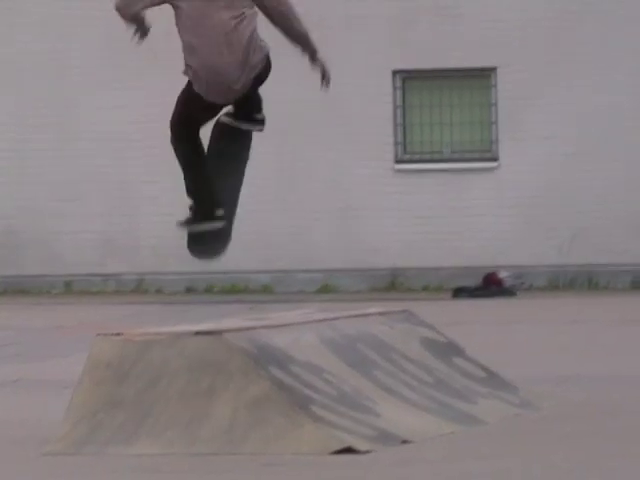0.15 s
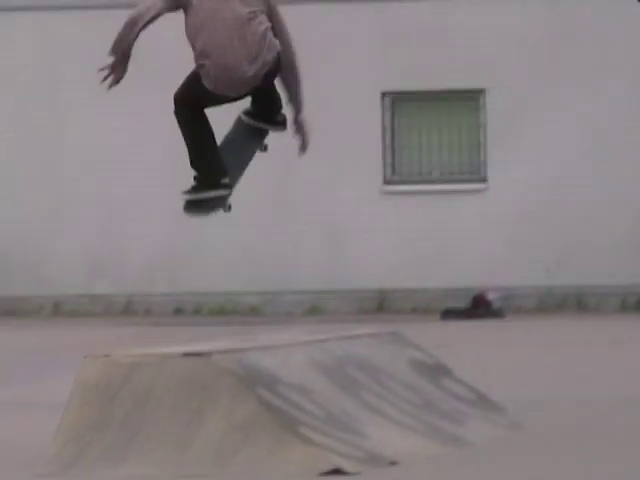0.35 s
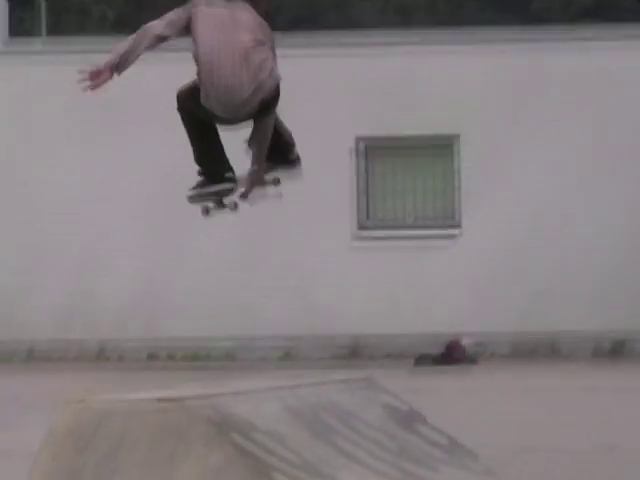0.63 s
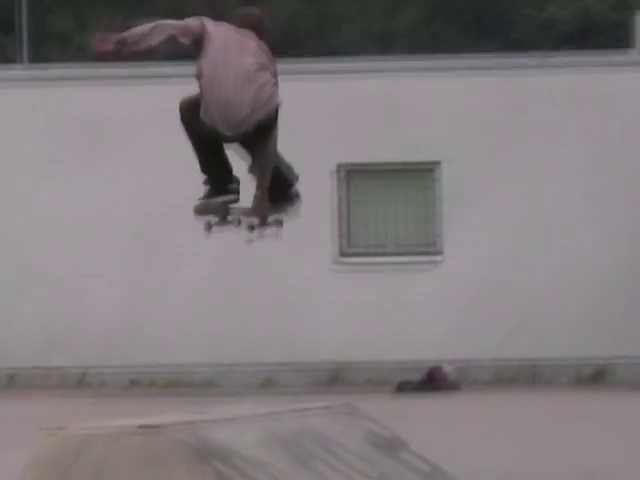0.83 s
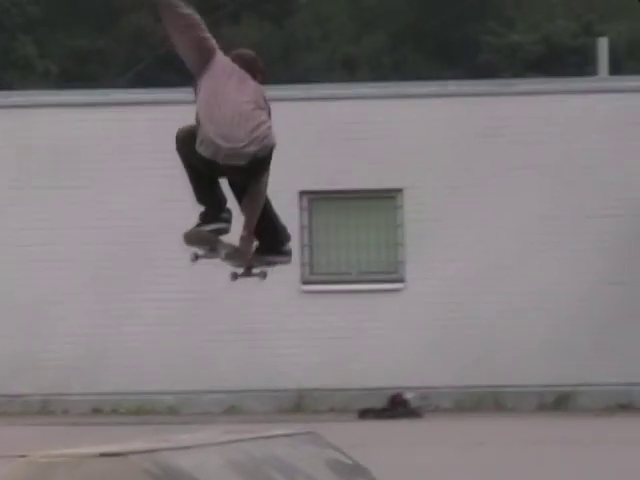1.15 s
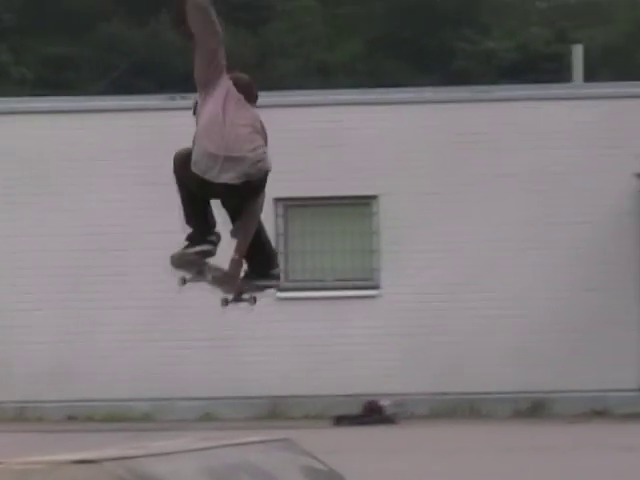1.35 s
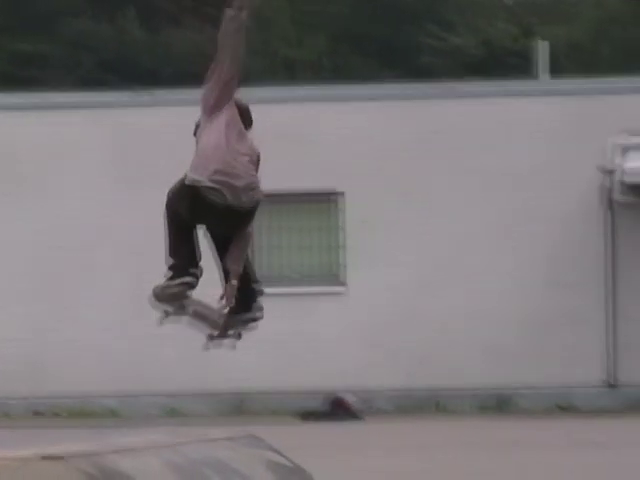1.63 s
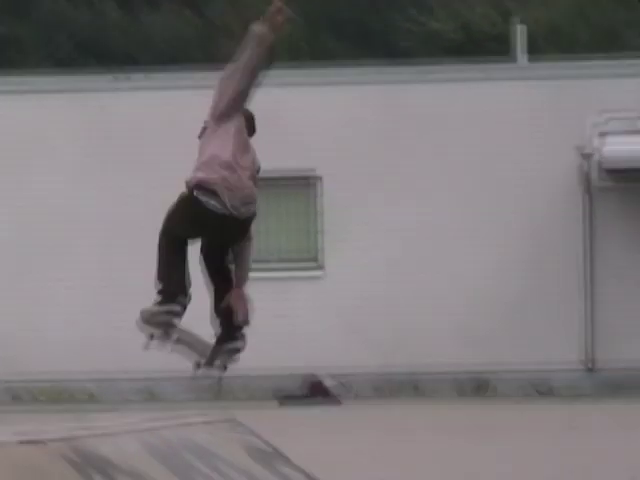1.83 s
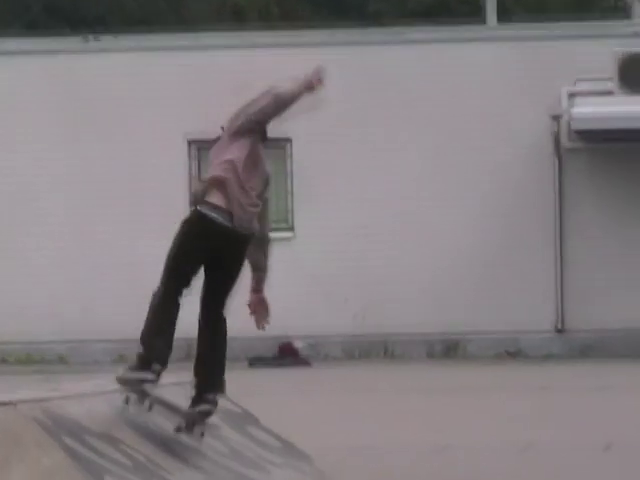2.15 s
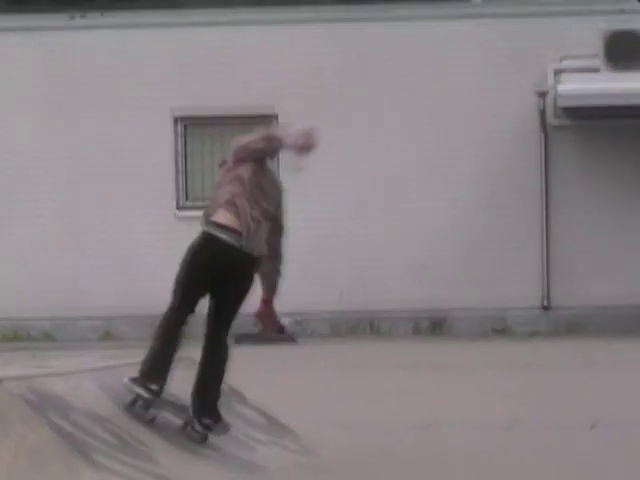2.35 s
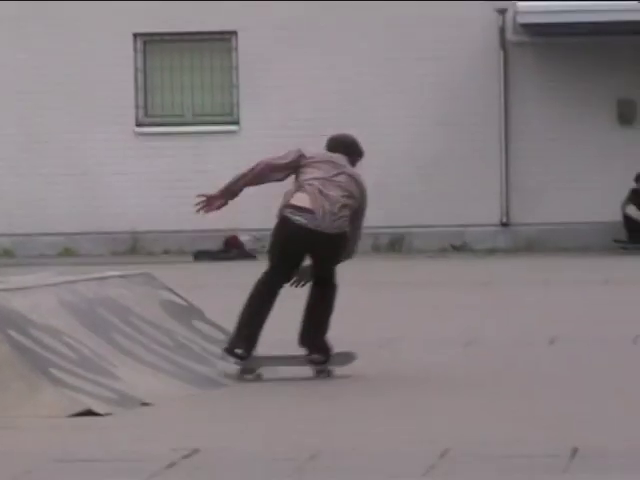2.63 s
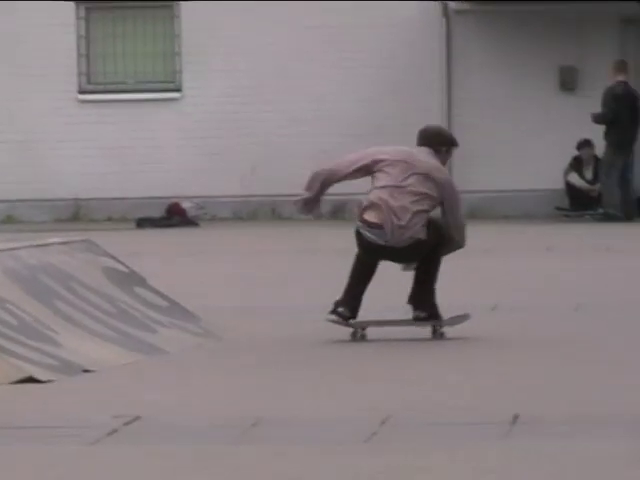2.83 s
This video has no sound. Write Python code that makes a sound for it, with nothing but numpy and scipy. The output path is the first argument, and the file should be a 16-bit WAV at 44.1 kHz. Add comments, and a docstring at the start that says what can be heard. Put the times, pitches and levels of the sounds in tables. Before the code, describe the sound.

Heavy slow-motion skateboard rolling and overloaded clacks on pavement, cut suddenly to distant rolling and clicks

```python
"""Outdoors on pavement, skateboard wheels rumble very close, deep and heavy as in slow motion.
Shaped noise makes the rolling, and narrow noise bands make resonances that sing in and out of it.
Knocks are struck deck and thump modes with noise cracks and truck rattle; the loudest blows overload.
The close sound is cut off abruptly, leaving noise-made faint rolling and light clicks farther away."""
import sys
import numpy as np
from scipy.fft import rfft, irfft, next_fast_len
from scipy.io import wavfile
from scipy.ndimage import map_coordinates

SR = 44100
rng = np.random.default_rng(int(sys.argv[2]) if len(sys.argv) > 2 else 0)


def store_pcm(level_fs):
    """Save levels as 16-bit WAV."""
    pcm = np.round(np.clip(level_fs, -1, 1) * 32767).astype(np.int16)
    wavfile.write(sys.argv[1], SR, np.atleast_2d(pcm).T)


N = 132300


def amp(db):
    """Decibels to gain."""
    return 10 ** (np.asarray(db) / 20)


def unit(x):
    """Scale to rms 1."""
    return x / np.sqrt(np.mean(x ** 2) + 1e-20)


def curves(rows):
    """Draw one value per sample for each column after the time."""
    times_s, *columns = np.transpose(rows)
    return [np.interp(np.arange(N) / SR, times_s, column) for column in columns]


def along(points, hz):
    """Read (frequency_hz, value) points on a log frequency axis."""
    point_hz, values = np.transpose(points)
    return np.interp(np.log(hz + 1), np.log(point_hz + 1), values)


def wobble(rate):
    """A smooth random curve with rate knots a second."""
    knots = rng.standard_normal(int(N * rate / SR) + 4)
    return map_coordinates(knots, [np.arange(N) * rate / SR])


def filtered(x, response):
    """Shape x by a response of frequency; zero padding keeps the tail from wrapping round."""
    size = next_fast_len(N + 8192)
    spectrum = rfft(x, size) * response(np.fft.rfftfreq(size, 1 / SR))
    return irfft(spectrum, size)[..., :N]


def noise(colour, side_db):
    """Stereo noise of rms 1: a shared middle plus an independent side that sets the width."""
    mid, side = filtered(rng.standard_normal((2, N)), lambda hz: amp(along(colour, hz)))
    side = amp(side_db) * side
    return unit(np.array([mid + side, mid - side]))


def pan(x, pan_db):
    """Make left louder than right by pan_db."""
    return x * amp([[pan_db / 2], [-pan_db / 2]])


def since(start_s):
    """Seconds after start_s, zero before it."""
    return np.maximum(np.arange(N) / SR - start_s, 0)


def decay(t, t60, attack):
    """A quick rise and an exponential fall."""
    return (1 - np.exp(-t / attack)) * np.exp(-np.log(1000) * t / t60)


# Contour of the close rolling: start_s, rumble_level_db, midrange_level_db, grit_level_db
ROLL_LEVELS = [(0, -18.5, -24.5, -46), (.27, -16.5, -22.5, -49.5), (.40, -14.5, -21, -60),
               (.46, -17.5, -21.5, -47.5), (.53, -15, -20, -45.5), (.61, -15.5, -22.5, -50),
               (.69, -17.5, -25, -36.5), (.87, -20.5, -25, -49), (.97, -19.5, -24, -38.5),
               (1.08, -20, -28, -42.5), (1.23, -17, -24, -48.5), (1.31, -17, -26, -40.5),
               (1.48, -18.5, -27, -47.5), (1.59, -19.5, -25, -56), (1.80, -17, -23.5, -50),
               (1.92, -22, -25, -61.5), (2.03, -17.5, -23.5, -51.5), (2.12, -17.5, -21.5, -40),
               (2.23, -20.5, -21.5, -41), (2.29, -13, -21, -41.5), (2.34, -17, -22.5, -44.5),
               (2.52, -17, -18, -64)]
# Colours of the rolling layers, relative density: frequency_hz, level_db_per_hz
RUMBLE_COLOUR = [(15, -13), (35, -5.5), (55, -5.5), (70, -1), (87, 2), (125, -3.5), (180, -1.5), (228, -1),
                 (275, -9.5), (400, -26.5), (700, -61), (2000, -120)]
ROAR_COLOUR = [(120, -36.5), (300, 3.5), (420, -0.5), (540, -0.5), (700, -5.5), (900, -10), (1200, -14),
               (1800, -19.5), (2300, -33.5), (3300, -44), (4400, -65), (7500, -47.5), (12000, -54),
               (15000, -97.5)]
GRIT_COLOUR = [(500, -24.5), (1300, -7.5), (2100, 7.5), (2450, -1.5), (3200, -3), (3800, -15.5),
               (4400, -27), (5300, -31), (6300, -17), (7600, -18.5), (9000, -25), (9700, -58),
               (10600, -26.5), (11800, -22.5), (13200, -27.5), (15000, -62)]  # also colours the trucks
BUMP_SPREAD_DB, GRAIN_DB = 1.44, 2.5  # uneven pavement: slow bumps (each layer takes a share), fine grain
NEAR_SIDE_DB, GRIT_SIDE_DB = -21, -13  # stereo width of the close board and of its brighter noises


def rolling():
    """Wheels on rough pavement: rumble, midrange roar and grit, shaken by the same bumps."""
    rumble_db, roar_db, grit_db = curves(ROLL_LEVELS)
    bumps = BUMP_SPREAD_DB * wobble(34.75)
    rumble = amp(rumble_db + 0.5 * bumps) * noise(RUMBLE_COLOUR, NEAR_SIDE_DB)
    roar = amp(roar_db + 0.73 * bumps) * noise(ROAR_COLOUR, NEAR_SIDE_DB)
    grain = unit(amp(GRAIN_DB * wobble(260)) * noise(GRIT_COLOUR, GRIT_SIDE_DB))
    grit = amp(grit_db + 1.4 * bumps) * grain
    return rumble + roar + grit


# Resonances that the rolling sings in: start_s (middle of the fade-in), end_s (start of the fade-out),
# centre_hz, half_width_hz, level_db
WHIRRS = [(0.496, 0.571, 80, 4.9, -12.5), (.70, 1.35, 2190, 56, -50.5), (1.25, 1.515, 232, 20, -22.5),
          (1.314, 1.829, 1097, 92, -36), (2.134, 2.334, 798, 49, -29)]
WHIRR_FADE_S = 0.025


def whirrs():
    """Narrow resonances of wheels and deck swell out of the roar and sink back."""
    out = np.zeros((2, N))
    for start_s, end_s, centre_hz, half_width_hz, level_db in WHIRRS:
        fade_in = np.clip(since(start_s - WHIRR_FADE_S / 2) / WHIRR_FADE_S, 0, 1)
        fade_out = np.clip(since(end_s) / WHIRR_FADE_S, 0, 1)
        band = filtered(rng.standard_normal(N),
                        lambda hz: 1 / (1 + ((hz - centre_hz) / half_width_hz) ** 2))
        out += amp(level_db) * (fade_in - fade_out) * unit(band)
    return out


DETUNE = 0.018  # random spread of each mode's pitch, as a fraction, so no two blows ring alike


def ring(start_s, modes):
    """Decaying sines (pitch_hz, level_db, t60_s, attack_s) struck together, varied from blow to blow."""
    t = np.arange(SR // 3) / SR
    out = np.zeros(N + SR)
    start = round(start_s * SR)
    variations = rng.standard_normal((len(modes), 2))
    for k, ((hz, db, t60, attack), (luck, shift)) in enumerate(zip(modes, variations)):
        tone = (-1) ** k * np.sin(2 * np.pi * hz * (1 + DETUNE * shift) * t)  # alternating polarity
        out[start:start + len(t)] += amp(db + 0.64 * luck) * decay(t, t60, attack) * tone
    return out[:N]


# Blows on the board: start_s, clack_level_db (deck), thump_level_db, crack_level_db (hard contact),
# rattle_level_db (trucks), ring_t60_s (deck), pitch_ratio
KNOCKS = [(.286, 2.5, -22, -30, -42, 0.042, 0.94), (.391, -18.5, -10.5, -27.5, -48, 0.14, 1.15),
          (.624, 9.5, -4, -0.5, -20, 0.071, 0.93), (0.901, -16.5, 4.5, -20.5, -26.5, 0.11, 1.02),
          (.986, -16, 1.5, -18.5, -20, 0.073, .95), (1.516, 2.5, 3.5, -20.5, -26.5, 0.045, 1.11),
          (1.530, -6, -7, -29.5, -52, .05, 1), (1.545, -6.5, -10, -24.5, -59, 0.063, 1.12),
          (1.635, -17.5, -20.5, -31.5, -67.5, 0.18, 0.95), (1.652, -14.5, -4, -25, -58, 0.23, 0.82),
          (1.824, 3.5, 1.5, -20.5, -38, 0.029, 1.014), (1.829, -1, -1.5, -22, -32.5, 0.17, .97),
          (1.852, -11.5, -19.5, -36, -61.5, 0.21, 1.096), (1.947, -9, 2.5, -30, -50.5, 0.11, 1.3),
          (2.05, -18, -9, -13.5, -21, 0.097, 1.15), (2.057, -3, 5, -9, -19.5, 0.12, .85),
          (2.352, -12.5, 4.5, -12.5, -30.5, 0.12, .9), (2.361, -13.5, -3, -19, -35.5, 0.16, 0.98),
          (2.377, -5.5, 6, -10.5, -26.5, 0.074, 1.02), (2.392, -5.5, 3.5, -20.5, -30.5, 0.089, 1.1),
          (2.406, -8.5, 2.5, -29.5, -38, 0.046, 0.82), (2.454, -12.5, 0, -19, -30, 0.051, 0.79),
          (2.477, -10.5, -11.5, -15.5, -35.5, 0.17, 0.883), (2.496, -11.5, -10, -18, -33.5, 0.11, 0.84)]
# Modes of the wooden deck at pitch ratio 1: pitch_hz, relative_level_db, share_of_ring_t60 (ratio)
DECK_MODES = [(350.6, -7, 1.32), (396.4, -6, 1.18), (491, -4.5, 0.73), (550.3, -1.5, 1.18),
              (661.3, -4, 0.92), (781, -8.5, 0.81), (934, -18.5, 1.17), (1250, -29.5, 1.1),
              (1446, -26.5, .6), (1900, -27, 0.48)]
# Modes of the loaded board on its wheels at pitch ratio 1: pitch_hz, relative_level_db, t60_s
THUMP_MODES = [(47, -10, 0.049), (88.3, -3.5, 0.14), (140, -6, .07), (176.2, -5, 0.098), (218, -2, 0.09)]
# Colour of the deck's dense ring, relative: frequency_hz, level_db
WOOD_COLOUR = [(80, -29), (300, 8), (550, -7.5), (780, 2), (1000, -13.5), (1600, -18.5), (2300, -48.5),
               (3500, -57.5), (4800, -62.5), (7800, -40.5), (14000, -73.5)]
# Colour of the hard contact, relative: frequency_hz, level_db_per_hz
CRACK_COLOUR = [(400, -25), (900, 3.5), (1250, 1), (1600, 1.5), (1900, -5.5), (2400, -16.5), (3200, -32.5),
                (4200, -45), (8000, -32.5), (14000, -63)]
WOOD_DB, CRACK_T60_S = -9.5, 0.065  # dense ring against the clack level; fall of the crack
CLACK_ATTACK_S, THUMP_ATTACK_S = 0.00075, 0.00084


def knocks():
    """Each blow cracks on contact, rings the deck and bounces the board on its wheels."""
    modes, dense, crack = np.zeros((3, N))
    for start_s, clack_db, thump_db, crack_db, _, t60, pitch in KNOCKS:
        deck = [(hz * pitch, db + clack_db, t60 * share, CLACK_ATTACK_S) for hz, db, share in DECK_MODES]
        thump = [(hz * pitch, db + thump_db, life, THUMP_ATTACK_S) for hz, db, life in THUMP_MODES]
        modes += ring(start_s, deck)
        modes += ring(start_s, thump)
        dense += amp(clack_db) * decay(since(start_s), t60, CLACK_ATTACK_S)
        crack += amp(crack_db) * decay(since(start_s), CRACK_T60_S, CLACK_ATTACK_S)
    wood = amp(WOOD_DB) * dense * noise(WOOD_COLOUR, NEAR_SIDE_DB)
    return modes + wood + crack * noise(CRACK_COLOUR, GRIT_SIDE_DB)


# Wheels ticking over small stones: start_s, level_db
STONE_TICKS = [(.146, -33), (.680, -30.5), (0.743, -32), (1.041, -34.5), (1.109, -36), (1.176, -31),
               (1.188, -32.5), (1.229, -34.5), (1.273, -26.5), (1.496, -23), (1.616, -34.5), (2.207, -35)]
RATTLE_T60_S, TICK_T60_S = 0.11, 0.061


def trucks():
    """The metal trucks rattle at each blow and tick at each stone: grainy bursts of gritty noise."""
    blows = sum(amp(rattle_db) * decay(since(start_s), RATTLE_T60_S, CLACK_ATTACK_S)
                for start_s, _, _, _, rattle_db, _, _ in KNOCKS)
    stones = sum(amp(level_db) * decay(since(start_s), TICK_T60_S, CLACK_ATTACK_S)
                 for start_s, level_db in STONE_TICKS)
    metal = unit(amp(GRAIN_DB * wobble(400)) * noise(GRIT_COLOUR, GRIT_SIDE_DB))
    return (blows + stones) * metal


# Level difference of the close board: frequency_hz, left_minus_right_db
BALANCE = [(60, -5.5), (500, -5.5), (1000, -5.5), (2000, -2.1), (4000, 10), (8000, -1.5), (12000, -1)]
# Phase difference of the close board: frequency_hz, left_lead_rad
LEFT_LEAD = [(100, 0.2), (500, -0.34), (1000, -0.27), (2000, -0.7), (4000, -1.2), (12000, -0.69)]


def ports(x):
    """Level and phase differ between the two microphone ports."""
    half = np.array([[0.5], [-0.5]])  # each side takes half of the difference
    return filtered(x, lambda hz: amp(half * along(BALANCE, hz)) * np.exp(1j * half * along(LEFT_LEAD, hz)))


# Contour of the distant rolling: start_s, level_db
FAR_LEVELS = [(2.52, -45.5), (2.65, -40.5), (2.72, -44), (2.85, -42), (3.0, -42)]
# Colour of the distant rolling, relative density: frequency_hz, level_db_per_hz
FAR_COLOUR = [(25, -27.5), (60, -25), (110, -12), (210, -6.5), (330, -4), (440, -12), (700, -8),
              (1250, -17.5), (1700, -18.5), (2700, -28), (4300, -33), (5800, -35), (7000, -42), (8500, -52),
              (12000, -53), (14000, -80)]
# Light distant clicks: start_s, level_db
FAR_CLICKS = [(2.580, -32), (2.627, -29.5), (2.643, -38.5), (2.665, -28.5), (2.760, -31), (2.941, -30.5)]
# Colour of the distant clicks, relative density: frequency_hz, level_db_per_hz
FAR_CLICK_COLOUR = [(80, -26), (220, 5), (700, 9), (1300, -7), (2100, -6), (3500, -20), (6500, -26),
                    (9000, -44)]
FAR_T60_S, FAR_SIDE_DB, FAR_PAN_DB = 0.031, -17, -5  # click fall, stereo width, left against right


def distant_board():
    """Faint rolling noise that wavers in level, with light noise clicks, farther off."""
    level_db, = curves(FAR_LEVELS)
    clicks = sum(amp(click_db) * decay(since(start_s), FAR_T60_S, CLACK_ATTACK_S)
                 for start_s, click_db in FAR_CLICKS)
    rolling_far = amp(level_db + 0.5 * wobble(28)) * noise(FAR_COLOUR, FAR_SIDE_DB)
    return rolling_far + clicks * noise(FAR_CLICK_COLOUR, FAR_SIDE_DB)


CUT_S, CUT_FADE_S = 2.519, 0.002  # the close sound is gone at the cut, after this short crossfade


def scene():
    """The close board, mostly a little to the right, gives way at once to the distant one."""
    far = np.clip(since(CUT_S - CUT_FADE_S) / CUT_FADE_S, 0, 1)
    close = ports(rolling() + whirrs() + knocks() + trucks())
    return (1 - far) * close + far * pan(distant_board(), FAR_PAN_DB)


CLIP_KNEE = 19.6  # exponent: higher is a harder clip
DULL_HZ, TOP_HZ = 13000, 16000  # corner of the treble loss, band limit


def record(dry):
    """The blows clip flat at full scale; the top of the treble is dull and ends at the band limit."""
    clipped = dry / (1 + np.abs(dry) ** CLIP_KNEE) ** (1 / CLIP_KNEE)
    return filtered(clipped, lambda hz: (hz < TOP_HZ) / np.sqrt(1 + (hz / DULL_HZ) ** 12))


dry = scene()
out = record(dry)
store_pcm(out)
```